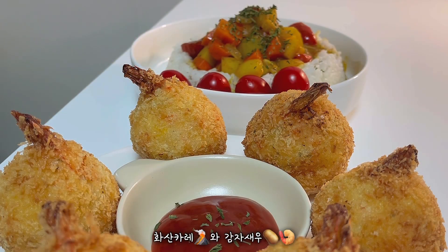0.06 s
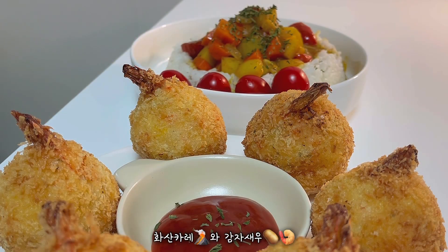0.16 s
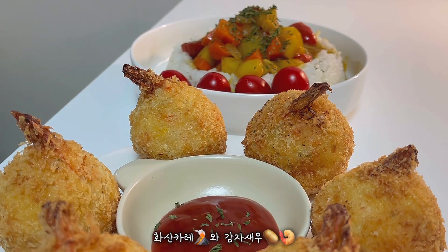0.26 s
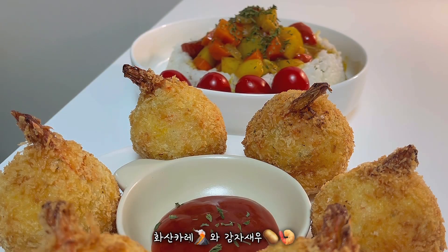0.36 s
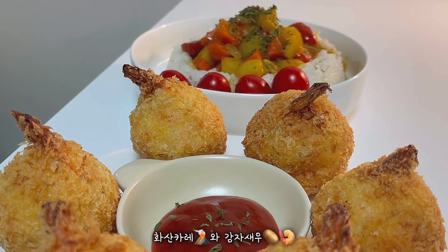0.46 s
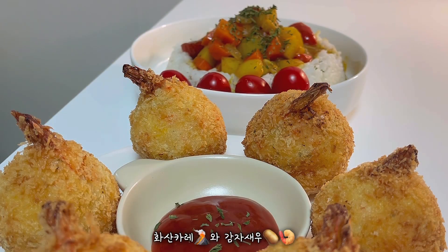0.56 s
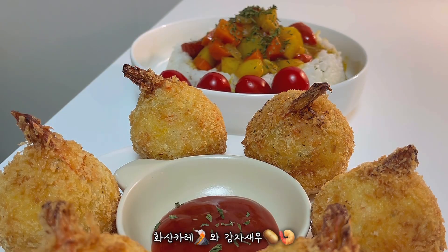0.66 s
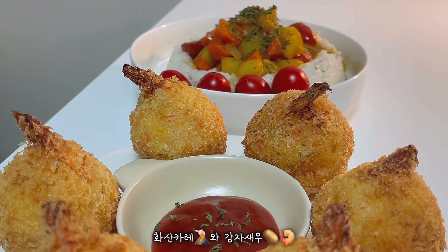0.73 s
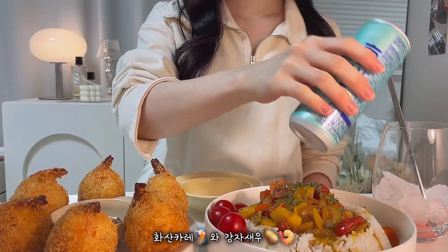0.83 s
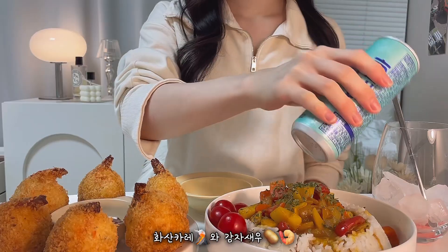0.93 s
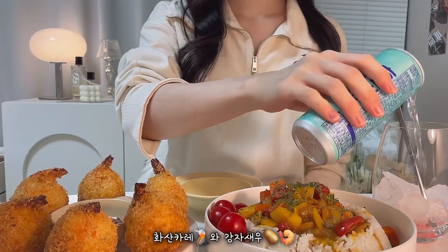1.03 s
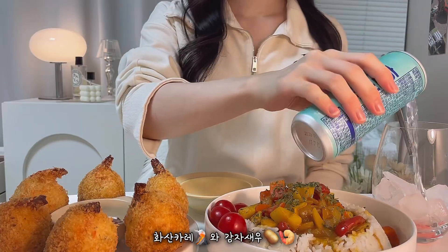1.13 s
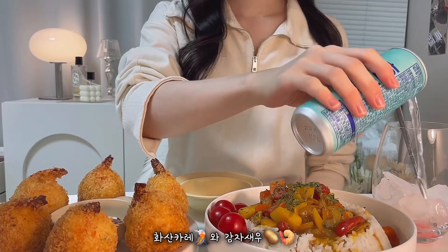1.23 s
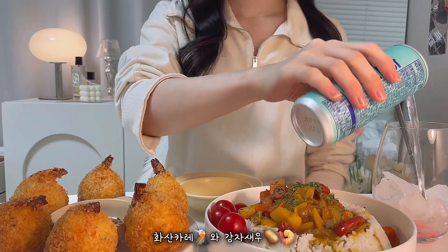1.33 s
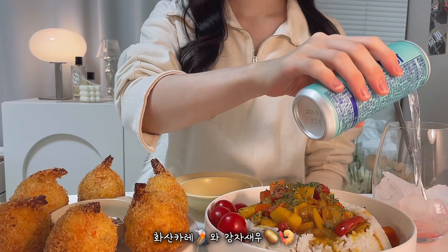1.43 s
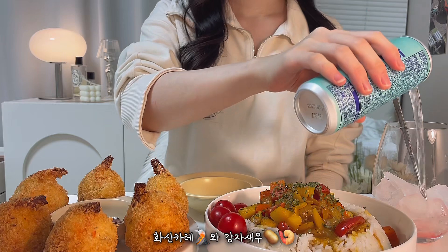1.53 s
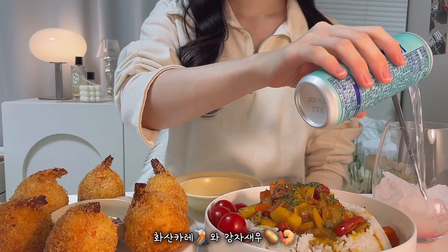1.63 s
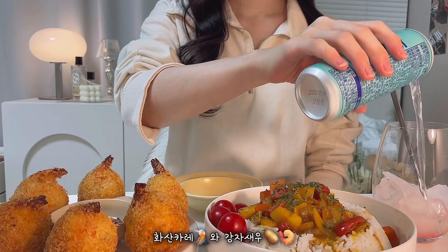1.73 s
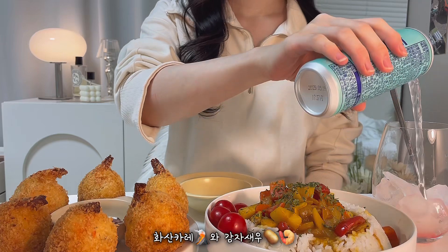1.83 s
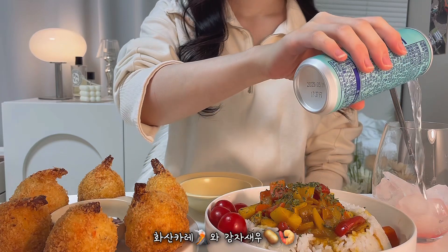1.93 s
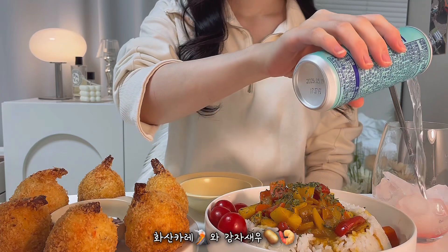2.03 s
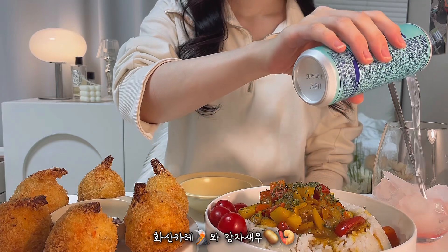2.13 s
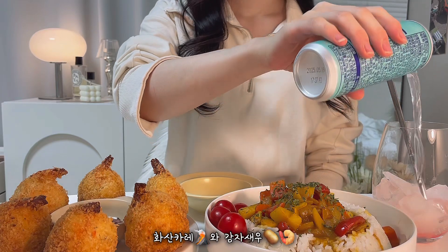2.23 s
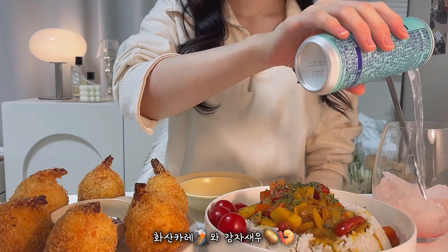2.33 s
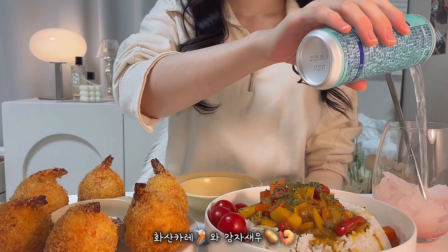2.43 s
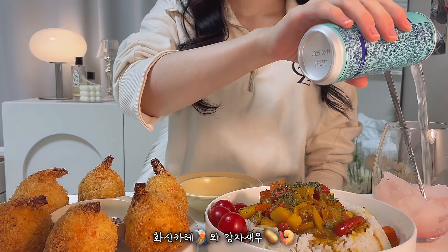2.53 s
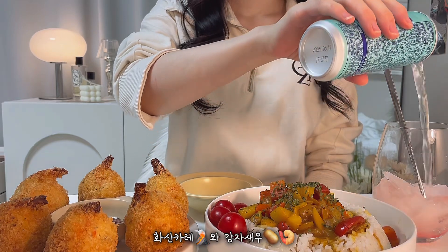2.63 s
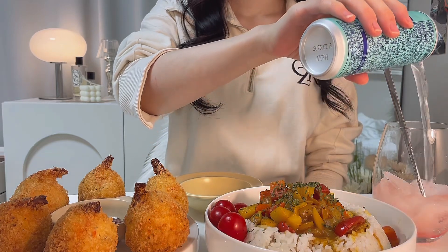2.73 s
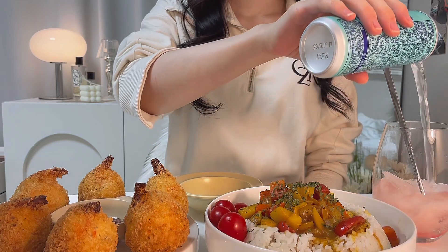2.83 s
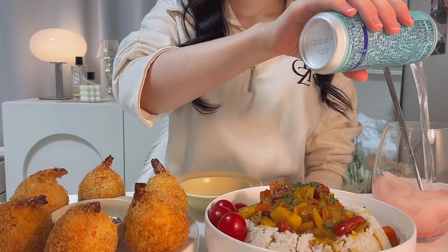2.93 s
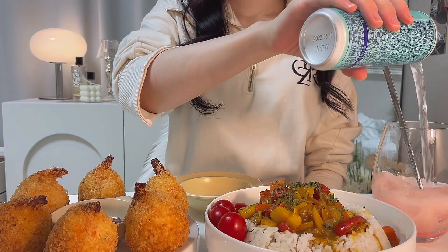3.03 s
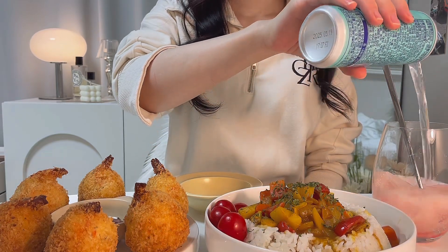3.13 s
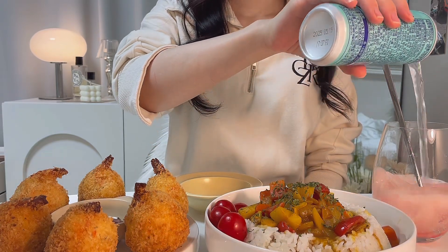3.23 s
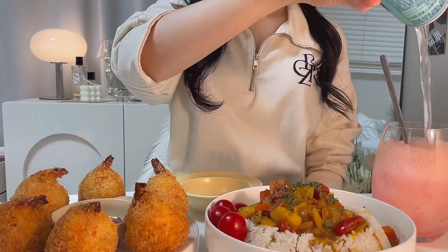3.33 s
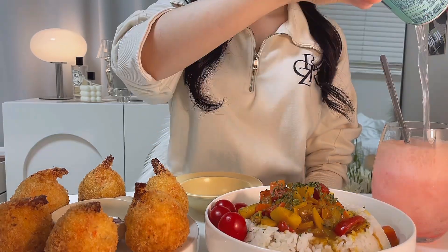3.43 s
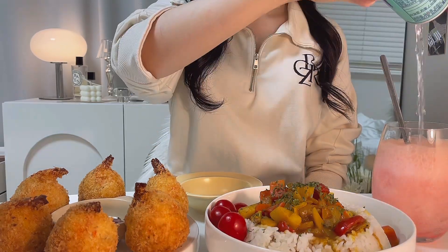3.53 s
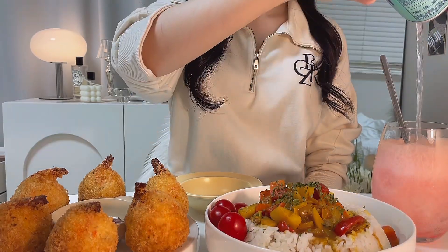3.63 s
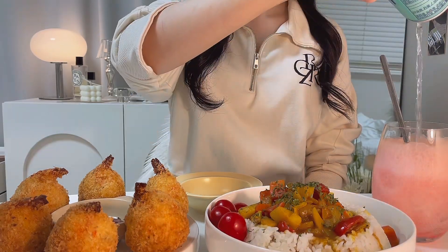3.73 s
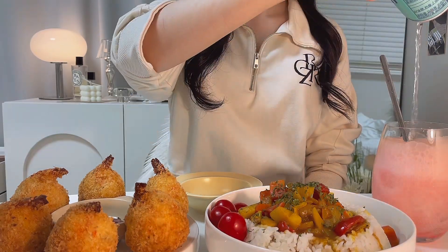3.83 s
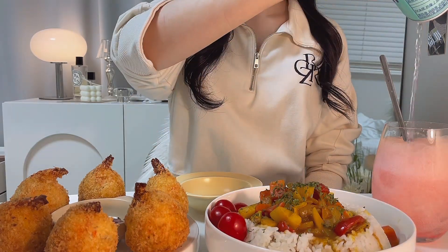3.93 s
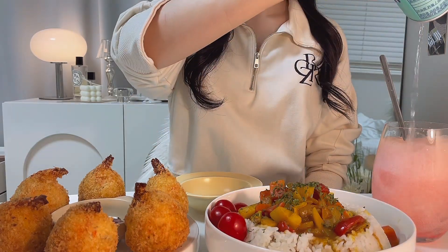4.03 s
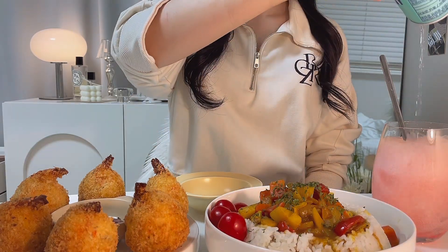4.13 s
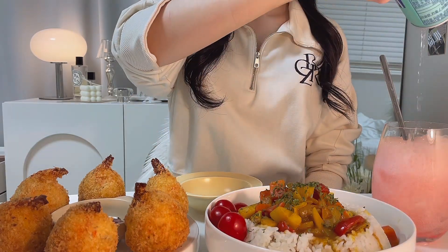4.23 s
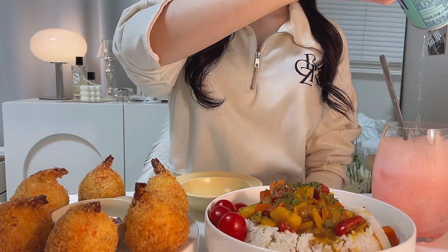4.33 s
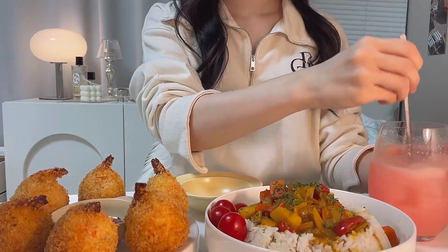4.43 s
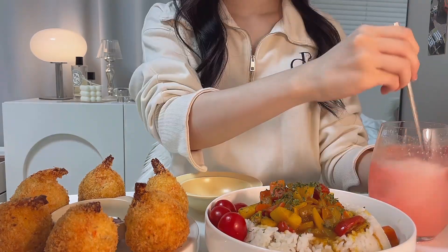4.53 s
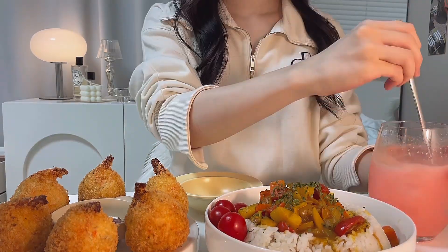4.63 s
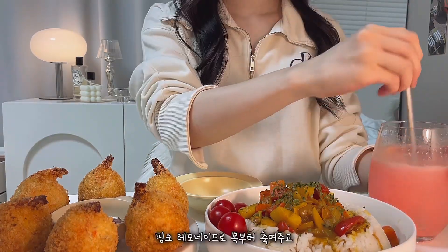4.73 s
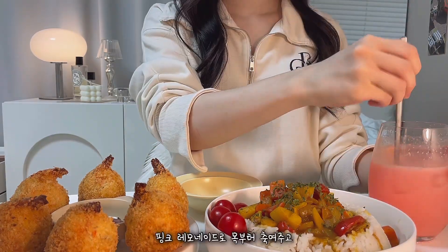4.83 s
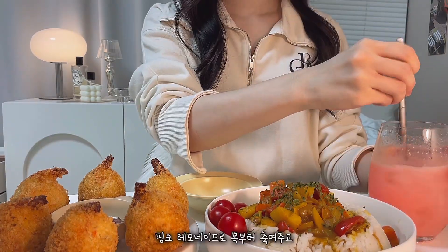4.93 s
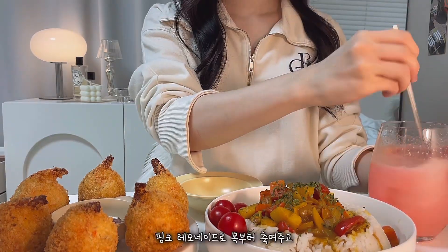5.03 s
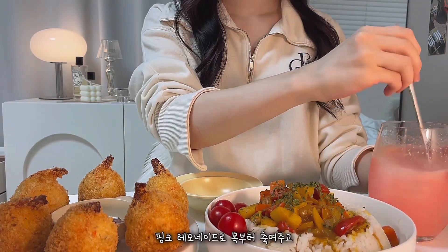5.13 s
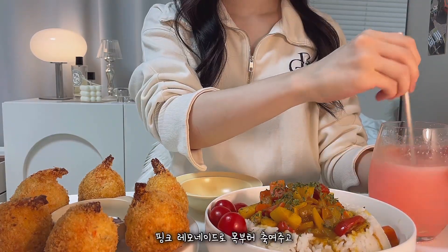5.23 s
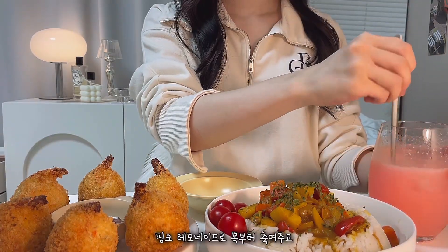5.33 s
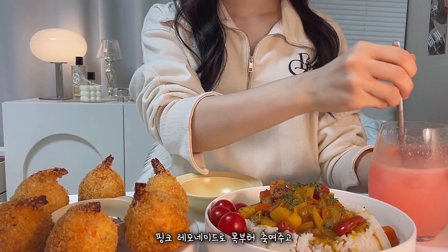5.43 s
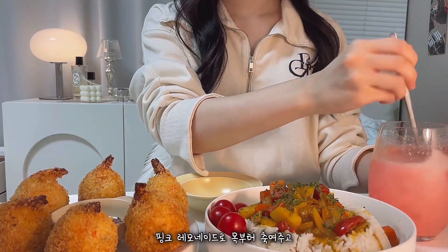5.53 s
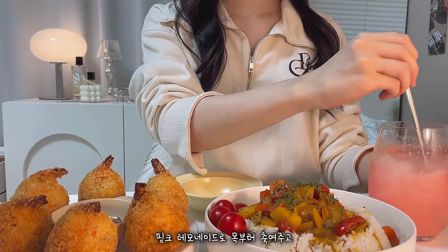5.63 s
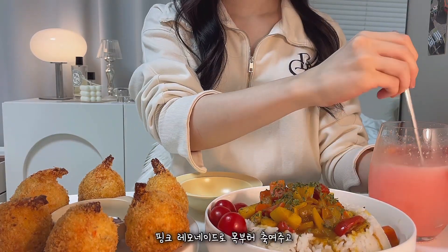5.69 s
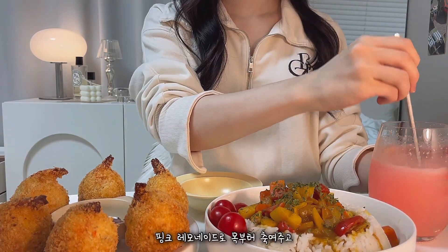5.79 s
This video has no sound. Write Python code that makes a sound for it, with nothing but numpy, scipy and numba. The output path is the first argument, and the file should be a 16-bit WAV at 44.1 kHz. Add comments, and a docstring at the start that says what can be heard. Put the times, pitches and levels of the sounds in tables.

```python
"""A fridge hums in a quiet room, two close tones beating; then a fizzy drink is poured from a can over ice into
a round glass and stirred with a metal straw, close to a phone. Bubbles, as short rings, make crackle at steady
pitch, and froth, splash and glugs at rising pitch; noise adds fizz. Ice knocks are bursts of noise driving
damped modes, with a dull thud; decaying pips are large bubbles bursting and clear rings of the straw tapping
the glass wall, and stirring grinds the cubes together."""
import sys
import numpy as np
from scipy import signal
from scipy.fft import rfft, irfft
from scipy.io import wavfile
from scipy.ndimage import uniform_filter1d
from numba import njit

SR = 44100
rng = np.random.default_rng(int(sys.argv[2]) if len(sys.argv) > 2 else 0)


def to_wav(sig):
    """Store sig (one row per channel, or 1-D mono) as 16-bit WAV at the path in sys.argv[1].

    Samples outside -1..1 are clipped; the rate is SR.
    """
    pcm = np.clip(np.atleast_2d(sig), -1, 1) * 32767
    pcm = np.round(pcm).astype(np.int16)
    wavfile.write(sys.argv[1], SR, pcm.T)  # frames by channels


N = 258426

# Overtones of the motor, smeared by its casing: (frequency [Hz], width [Hz], level [dB])
CASING_OVERTONES = [(120, 11, -65), (133.8, 16, -60), (172.5, 22, -67.5), (240.2, 20, -54.5),
                    (278.3, 22, -63.5), (367.7, 30, -64.5), (486, 24, -72.5)]
# Spectrum of the room air: (frequency [Hz], density [dB per Hz])
ROOM_SPECTRUM = [(15, -57), (25, -36), (39, -4), (64, -1.5), (88, -11.5), (112, -12), (196, -14.5),
                 (243, -12.5), (309, -18), (363, -22), (394, -23), (488, -32), (15000, -46)]
# Tilt that turns room air into faint hiss: (frequency [Hz], gain [dB])
HISS_TILT = [(1150, -26), (1550, 9), (6500, 7.5), (7100, -15), (7900, -15), (8700, 4), (12500, 2.5),
             (13500, -19)]
# Steps of the hum: (start [s], mains tone [dB], motor tone [dB], delay until both are in step [s],
# mains phase [turns], rumble [dB])
HUM_STEPS_TABLE = [(0, -48.5, -53.5, 0.14, 0.34, -54.5), (.78, -46, -52, 0.2, 0.34, -52),
                   (3.331, -45, -55.5, 0.12, 0.067, -52.5), (4.379, -46.5, -51, 0.31, 0.47, -50)]
# Fizz of the drink: (time [s], coarse hiss level [dB], finest bubbles level [dB])
FIZZ_LEVELS = [(1.04, -90, -81), (1.12, -68, -68), (1.18, -59, -59.5), (1.3, -58.5, -59),
               (3.29, -62, -63.5), (3.36, -64, -67), (5.86, -66, -69)]
# Spectrum of the fizz: (frequency [Hz], density [dB per Hz])
FIZZ_SPECTRUM = [(1300, -39), (1630, 5.5), (1900, -11.5), (2240, 2), (2660, -8), (3000, 0.5), (4000, 0.5),
                 (5000, 4.5), (6500, 2), (7100, -23.5), (7900, -14), (8700, -7.5), (11200, -8.5),
                 (12900, -16), (13600, -41), (16000, -30)]
# Resonances of the glass at which the froth bubbles are pitched: (frequency [Hz], nearly empty [dB], full [dB])
GLASS_RESONANCES = [(1630, -7.5, -35), (2240, -3.5, -31), (2930, -2.5, -6.5), (3700, -6.5, -11),
                    (4050, -2.5, -21), (4850, -19.5, -1), (5130, -14, 0)]
# Filling of the glass: (time [s], fullness [0-1], froth gain [dB])
FILLING = [(1.1, 0.05, -79), (1.17, 0, -67), (2.05, 0.5, -65.5), (2.25, 0.48, -66), (3.3, 0.57, -64),
           (3.35, 0.9, -82)]
# The poured stream: (time [s], glug level [dB], splash level [dB])
STREAM_LEVELS = [(1.1, -83, -84), (1.21, -62, -72), (1.25, -72, -69), (1.32, -54.5, -78),
                 (1.36, -68, -61.5), (1.43, -54, -70), (1.49, -70, -70), (1.533, -53, -80), (1.6, -72, -71),
                 (1.86, -65, -73), (1.98, -76.5, -74), (2.07, -59, -68), (2.18, -57, -77), (2.25, -68, -63),
                 (2.37, -54.5, -82), (2.44, -63.5, -66), (2.53, -57, -63.5), (2.66, -66.5, -70),
                 (2.76, -63, -73), (2.88, -58.5, -67), (3.03, -68, -73), (3.1, -51.5, -73),
                 (3.21, -78, -66), (3.27, -58, -62), (3.33, -91, -66), (3.5, -99, -59), (4.36, -99, -66.5)]
# Large bubbles bursting, and clear rings of the straw tapping the glass wall: # (time [s], level [dB], initial
# pitch [Hz], t60 [s])
PIP_EVENTS = [(1.128, -47, 4250, .015), (1.173, -46.5, 3040, 0.016), (1.174, -47.5, 3920, 0.02),
              (1.256, -46, 4850, 0.016), (1.425, -48, 3060, .015), (1.467, -47, 3020, 0.016),
              (1.5094, -51, 3000, .012), (1.53, -54, 2980, .015), (1.6173, -51, 2870, 0.035),
              (1.6885, -50.5, 5840, .012), (2.1813, -46.5, 5600, .012), (2.212, -48, 6300, .012),
              (2.234, -46.5, 4850, .012), (2.298, -48, 4820, .012), (2.307, -46, 2850, .014),
              (2.4881, -51.5, 4760, .015), (2.548, -48, 3180, 0.014), (2.611, -50.5, 2500, 0.022),
              (2.8353, -47.5, 5050, 0.01), (3.016, -51, 3050, .015), (3.723, -53, 1620, 0.03),
              (4.548, -39, 1680, .025), (4.69, -41.5, 1630, 0.064), (4.765, -49, 2500, 0.036),
              (5.18, -44, 1640, 0.026), (5.199, -34.5, 1640, 0.048), (5.2563, -29.5, 2450, 0.048),
              (5.527, -28.5, 1620, 0.019), (5.8052, -27.5, 2460, 0.021), (5.821, -25, 1624, 0.036),
              (5.8524, -26.5, 2400, 0.041)]
# Sweeps of the straw through the ice: (strongest time [s], grinding level [dB], half length [s])
STRAW_SWEEPS = [(4.542, -36, 0.079), (4.858, -49, 0.045), (5.002, -40, 0.074), (5.258, -45, 0.051),
                (5.384, -42, 0.065), (5.564, -42.5, 0.069), (5.829, -40, 0.038)]
# Ice knocks: (time [s], thud level [dB], clack minus thud [dB], tick minus thud [dB], thud pitch [Hz])
ICE_KNOCKS = [(1.004, -62, -15, 9, 563), (1.089, -61, 3.5, 5, 547), (1.172, -62, 19, 7, 614),
              (1.699, -51, -11, 4, 640), (2.141, -54.5, -21, 13.5, 676), (2.3185, -39, 0.5, 18, 980),
              (2.494, -52.5, 4, 18.5, 760), (2.7, -31.5, -14.5, -3.5, 645), (2.827, -43.5, -4, -24, 550),
              (2.855, -45.5, -18, 4, 664), (3.11, -46, -29, -7, 710), (3.152, -30, -10.5, 1, 680),
              (3.319, -49, -7, -20, 650), (3.369, -44, -8, -2, 1110), (3.497, -41.5, -25, -27, 690),
              (3.709, -45, -19, -30, 700), (3.716, -43.5, -25, -32, 930), (3.771, -47, -23, -30, 685),
              (3.919, -47, -20, -17, 1000), (4.139, -59.5, 2, 15.5, 937), (4.377, -31, -17, -25, 910),
              (4.382, -22, -14.5, -21, 844), (4.406, -29, -27, -26, 860), (4.428, -23, -8, -13.5, 1010),
              (4.433, -28, -26, -30, 1070), (4.457, -47, -8, -15, 1110), (4.476, -28, -0.5, -16, 1090),
              (4.489, -21.5, -7.5, -21, 705), (4.501, -26, -13, -23, 720), (4.528, -29.5, 2, -8, 1130),
              (4.538, -20.5, -10, -16.5, 680), (4.583, -22.5, 7, 7.5, 1030), (4.644, -34, -8, -11, 870),
              (4.662, -34.5, -7, -20, 800), (4.673, -35.5, -19, -25, 1010), (4.692, -45, 5, -1, 1030),
              (4.779, -38.5, -7.5, -12, 670), (4.829, -14.5, -13, -21, 746), (4.884, -16.5, -39, -47, 715),
              (4.904, -24, -10, -22, 1080), (4.961, -31, -8, -24, 1240), (4.982, -22.5, -9.5, -9, 770),
              (4.993, -19, -19.5, -49, 986), (5.019, -29, -6.5, -40, 1060), (5.042, -21, -13, -42, 730),
              (5.059, -30, -15, -11, 650), (5.104, -23.5, -40, -45, 1030), (5.141, -44, 1.5, -9, 990),
              (5.164, -37, -5, -11, 1000), (5.182, -47.5, 9.5, 3, 970), (5.199, -37.5, 3.5, 0, 564),
              (5.216, -27, -19, -22, 1040), (5.255, -19.5, -8, -34, 786), (5.269, -27, -6, -12.5, 935),
              (5.281, -22, -29, -38, 750), (5.327, -29.5, -4.5, -17, 1070), (5.334, -22.5, -22, -36, 775),
              (5.349, -19.5, -6.5, -32, 780), (5.368, -20, -6.5, -38, 714), (5.375, -20, -23, -34, 1024),
              (5.383, -23.5, -22, -41, 1130), (5.396, -32, -7, -32, 1000), (5.457, -34.5, -3.5, -13, 1050),
              (5.472, -42, -3, -20, 900), (5.49, -34.5, -4, -36, 710), (5.503, -35.5, -6, -29, 1043),
              (5.513, -36, -3.5, -25, 806), (5.528, -20.5, -8.5, -16.5, 750), (5.55, -32.5, -8, -9, 1080),
              (5.558, -27, -1.5, -5, 1090), (5.569, -36, -19, -20, 1310), (5.582, -33, -9, -28, 1180),
              (5.594, -20, -27, -37, 780), (5.608, -28, -20, -35, 1240), (5.621, -41.5, 6, 1, 910),
              (5.642, -18.5, -13.5, -49, 835), (5.651, -26.5, -12, -36, 930), (5.681, -33, -6, -25, 1007),
              (5.706, -48.5, 8, 1, 1000), (5.717, -41.5, 8, 3, 1010), (5.731, -36, 0, -25, 760),
              (5.756, -34, -24, -30, 765), (5.774, -36, -17, -35, 840), (5.793, -24.5, -7, -13, 800),
              (5.806, -19, -6, -20, 830), (5.821, -22, -2, -36, 760), (5.851, -26.5, -7, -9.5, 710)]
# Nominal modes of the glass and ice: (frequency [Hz], level [dB], t60 [s])
GLASS_ICE_MODES = [(620, -10, .025), (710, -4, .028), (840, -5, .028), (1035, 1, .055), (1150, -4, .035),
                   (1300, -4, .03), (1650, -6, .035), (2400, -12, .028)]
# Nominal thin rings of the glass wall under the crack: (frequency [Hz], level [dB], t60 [s])
WALL_MODES = [(1900, 31.5, 0.025), (3620, 6.5, 0.038), (4300, -24, 0.03), (5050, 13, 0.019),
              (5480, -12, 0.058)]
# Nominal highest rings, under the tick: (frequency [Hz], level [dB], t60 [s])
HIGH_MODES = [(11390, -2.8, 0.015), (10370, 0.9, 0.083)]
# Crack of ice on glass: (frequency [Hz], density [dB per Hz])
CRACK_SPECTRUM = [(1500, 20.5), (2000, 7), (2500, 9), (3300, 4), (4300, 4), (5500, -5), (6500, -4),
                  (7500, -13.5), (8600, -4.5), (10100, -6.5), (11300, -0.5), (13000, -18), (14200, -28),
                  (15400, -40)]
# The two microphone ports: (frequency [Hz], side gain over mid [dB], side phase against mid [rad])
PORT_RESPONSE = [(60, -10, -1.1), (110, -8.5, -1.9), (199, -12.5, -1.8), (376, -3, -1.14), (706, 0, -1.81),
                 (1290, -1, -1.47), (2380, -6.5, -1.4), (4500, -4, -0.6), (5900, -1, -1.08),
                 (7660, 19.5, -1.7), (9060, 0, -1.5), (12400, -24, -1.5), (13280, 17.5, -1.6),
                 (16000, 9, -1.2)]

MAINS_HZ, MOTOR_HZ = 60, 58.7
CASING_STEADY = 0.95  # steady part of each overtone against its wavering parts
# the faint hiss throbs (depth before smoothing), then drops to a lower, steady level
HISS_DB, THROB_DB, THROB_S, THROB_ENDS_S, HISS_AFTER_DB = -76.5, 4.5, 0.227, 0.774, -83.5
# the air in the glass rings higher as the drink rises
AIR_HZ, AIR_RISE_HZ_PER_S, AIR_FULL_HZ, POUR_S = 637.5, 53, 800, 1.13
PIP_SPRAY_DB, PIP_SPRAY_S = -6.5, 0.0041  # spray relative to its pip, and its decay time
# cubes drift on between sweeps; stirring frees more gas (fizz gain over the grinding level)
STIR_S, DRIFT_DB, STIRRED_FIZZ_DB = 4.37, -59, -27.5
MODE_SCATTER_DB = 3
THUD_CYCLES, THUD_SKEW = 3.26, 0.79  # length of the thud; a skew under 1 swells quickly and dies slowly
# a stronger crack against the thud has less low end, a stronger tick more of its very top [dB per dB]
CRACK_TILT, DULL_CLACK_DB, TILT_MOST_DB = 2, 0, 10
TICK_TILT, EVEN_TICK_DB = 0.55, 14
ROOM_T60_S, ROOM_DB = 0.2, -9.5
TOP_HZ = 16400


def undb(db):
    """Logarithmic level: decibels to amplitude gain."""
    return 10 ** (np.asarray(db) / 20)


def unit(x):
    """Power normalization: scale to rms 1."""
    return x / np.sqrt(np.mean(x ** 2))


def peak(x):
    """Amplitude normalization: scale to peak 1."""
    return x / np.max(np.abs(x))


def curve(table, column, outside=None):
    """Linear interpolation of one table column along time."""
    rows = np.array(table)
    return np.interp(np.arange(N) / SR, rows[:, 0], rows[:, column], left=outside, right=outside)


def colour(x, table):
    """Linear filtering in the frequency domain by (Hz, dB) points; a third column turns the phase."""
    hz, db, *turn = np.transpose(table)
    log_hz = np.log(np.fft.rfftfreq(len(x), 1 / SR) + 1)
    gain = undb(np.interp(log_hz, np.log(hz), db))
    phase = np.interp(log_hz, np.log(hz), turn[0]) if turn else 0
    return irfft(rfft(x) * gain * np.exp(1j * phase), len(x))


def band(x, lo_hz, hi_hz):
    """Band-pass filtering with a third-order Butterworth design."""
    return signal.sosfilt(signal.butter(3, [lo_hz, hi_hz], "band", fs=SR, output="sos"), x)


def walk(rate):
    """Slow random modulation: levels held 1 / rate s, smoothed twice, rms 1."""
    hold = int(SR / rate)
    levels = np.repeat(rng.standard_normal(N // hold + 1), hold)
    smooth = uniform_filter1d(uniform_filter1d(levels, hold), hold)
    return unit(smooth[:N])


@njit
def grains(start, hz, cycles, size, glide, n):
    """Bubble resonance: each rings for a few cycles, its pitch rising by the given glide, if any."""
    out = np.zeros(n)
    for k in range(len(start)):
        w, z, i = 2 * np.pi * hz[k] / SR, size[k] + 0j, start[k]
        fade = np.exp(-hz[k] / (cycles * SR))
        for j in range(int(5 * cycles * SR / hz[k])):
            if i + j < n:
                out[i + j] += z.imag
            z *= fade * np.exp(1j * w)
            w *= 1 + glide * hz[k] / (cycles * SR)
    return out


def bubbles(count, hz, spread, cycles, scatter_db, glide):
    """Random superposition of bubbles, pitches around hz, a few much louder than the rest; rms 1."""
    when, detune, loud = rng.random((count, 3)).T
    start = (when * N).astype(np.int64)
    pitch = (hz + np.zeros(N))[start] * np.exp(spread * (2 * detune - 1))
    pitch = np.clip(pitch, 100, SR / 3)
    size = undb(np.minimum(-scatter_db * np.log(1 - loud), 13))
    return unit(grains(start, pitch, 1. * cycles, size, 1. * glide, N))


def ring(blow, modes, draw):
    """Modal excitation: a blow drives modes whose levels and pitches vary at random; peak 1."""
    t = np.arange(len(blow)) / SR
    body = 0
    for (hz, db, t60), (level_draw, pitch_draw) in zip(modes, draw):
        gain = undb(db + MODE_SCATTER_DB * level_draw)
        tone = np.sin(2 * np.pi * hz * (1 + 0.039 * pitch_draw) * t)
        body = body + gain * tone * np.exp(-np.log(1000) * t / t60)
    return peak(signal.fftconvolve(blow, body)[:len(t)])


def step(column):
    """Stepwise modulation: one column of the hum's steps, each change smoothed over 1600 samples."""
    rows = np.array(HUM_STEPS_TABLE)
    now = np.searchsorted(rows[1:, 0], np.arange(N) / SR)
    return uniform_filter1d(rows[now, column], size=1600)


def room_air():
    """Filtered broadband noise: low rumble and a faint hiss that throbs at first."""
    t = np.arange(N) / SR
    air = colour(rng.standard_normal(N), ROOM_SPECTRUM)
    rumble = unit(band(air, 90.4, 1250)) * undb(step(5)) + undb(-68) * unit(band(air, 27, 52))
    throbbing_db = HISS_DB + THROB_DB * np.cos(2 * np.pi * t / THROB_S)
    hiss_db = np.where(t < THROB_ENDS_S, throbbing_db, HISS_AFTER_DB)
    hiss = unit(colour(colour(rng.standard_normal(N), ROOM_SPECTRUM), HISS_TILT))
    return rumble + hiss * undb(uniform_filter1d(hiss_db, size=3000))


def fridge():
    """Beating: mains tone and slipping motor drift through phase, under narrow, unsteady overtones."""
    t = np.arange(N) / SR
    mains = 2 * np.pi * (MAINS_HZ * t + step(4))
    beat = 2 * np.pi * (MAINS_HZ - MOTOR_HZ) * (t - step(0) - step(3))
    tone = np.sqrt(2) * (undb(step(1)) * np.sin(mains) + undb(step(2)) * np.sin(mains - beat))
    rumble_db = step(5)
    swell = undb(rumble_db - np.mean(rumble_db))  # the casing swells with the rumble
    overtones = np.zeros(N)
    for hz, width, db in CASING_OVERTONES:
        in_phase = (CASING_STEADY + walk(width)) * np.cos(2 * np.pi * hz * t)
        quadrature = walk(width) * np.sin(2 * np.pi * hz * t)
        overtones += undb(db) * (in_phase + quadrature)
    return tone + swell * overtones


def stirring():
    """Amplitude envelope of the grinding cubes: a Gaussian swell for each sweep over a steady drift."""
    t = np.arange(N) / SR
    sweeps = sum(undb(db) * np.exp(-((t - s) / half) ** 2) for s, db, half in STRAW_SWEEPS)
    return (sweeps + undb(DRIFT_DB)) * np.clip((t - STIR_S) / 0.017, 0, 1)


def fizz():
    """Superposed bubble bursts: a smooth hiss of noise with single crackles and sparkle in it."""
    crackle = bubbles(count=30000, hz=6150, spread=1.3, cycles=1.3, scatter_db=6.5, glide=0)
    sparkle = bubbles(count=4000, hz=10600, spread=0.191, cycles=40, scatter_db=15.0, glide=.003)
    hiss = colour(rng.standard_normal(N) + undb(-12.0) * crackle, FIZZ_SPECTRUM)
    coarse = unit(band(hiss, 2060, 6780)) * undb(walk(30.56))
    fine = unit(band(hiss, 5340, 13400)) * undb(walk(29.91)) + undb(-6.0) * sparkle
    stirred = undb(STIRRED_FIZZ_DB) * stirring()
    coarse_gain = undb(curve(FIZZ_LEVELS, 1, -120)) + stirred
    fine_gain = undb(curve(FIZZ_LEVELS, 2, -120)) + undb(-3.0) * stirred
    return coarse * coarse_gain + fine * fine_gain


def froth():
    """Resonance: dense small bubbles pitched at modes of the glass, rebalanced as it fills."""
    full = np.clip(curve(FILLING, 1), 0, 1)
    swarm = np.zeros(N)
    for hz, empty_db, full_db in GLASS_RESONANCES:
        level_db = empty_db + (full_db - empty_db) * full + 1.9 * walk(14)
        grain = bubbles(count=1500, hz=hz, spread=.045, cycles=9, scatter_db=3.8, glide=.003)
        swarm += undb(level_db) * grain
    return undb(curve(FILLING, 2, -120)) * swarm


def pour():
    """Air-column resonance: glugs climb in pitch as the glass fills; splash spreads around them."""
    t = np.arange(N) / SR
    air_hz = np.minimum(AIR_HZ + AIR_RISE_HZ_PER_S * (t - POUR_S), AIR_FULL_HZ)
    glugs = bubbles(count=2200, hz=air_hz, spread=0.056, cycles=4.4, scatter_db=2.5, glide=0.033)
    splash = bubbles(count=6000, hz=852, spread=0.49, cycles=1.0, scatter_db=1.0, glide=0.016)
    glug_gain = undb(curve(STREAM_LEVELS, 1, -120) + 0.87 * walk(24.7))
    return glug_gain * glugs + undb(curve(STREAM_LEVELS, 2, -120)) * splash


def pips():
    """Damped oscillation: each pip swells and dies, its pitch creeping up, under a short spit of spray."""
    out, t = np.zeros(N + 2048), np.arange(2048) / SR
    for s, db, hz, t60 in PIP_EVENTS:
        shape = peak((1 - np.exp(-t / 0.00037)) * np.exp(-np.log(1000) * t / t60))
        tone = shape * np.sin(2 * np.pi * hz * t * (1 + 0.41 * t))
        spit = rng.standard_normal(len(t)) * np.exp(-t / PIP_SPRAY_S)
        spray = peak(band(spit, hz / 1.42, hz * 1.9))
        start = int(s * SR)
        out[start:start + 2048] += undb(db) * (tone + undb(PIP_SPRAY_DB) * spray)
    return out[:N]


def grinding():
    """Random impulsive excitation: small bumps between cubes ring the same glass and crunch faintly."""
    bumps = (rng.random(N) < 700 / SR) * undb(np.minimum(3.5 * rng.exponential(size=N), 9))  # 700 per s
    contact = signal.lfilter([1], [1, -np.exp(-1 / (0.0024 * SR))], bumps)  # decay constant 2.4 ms
    scrape = contact * rng.standard_normal(N)
    # the scrape switches at random among four random variants of the modes
    variant = rng.integers(4, size=N // 1024 + 1).repeat(1024)[:N]
    low = np.zeros(N)
    for k, draw in enumerate(rng.standard_normal((4, 8, 2)) / 2):
        low += unit(ring(scrape * (variant == k), GLASS_ICE_MODES, draw))
    high = colour(band(scrape, 1400, 6000), CRACK_SPECTRUM)
    return stirring() * (unit(low) + undb(-17.0) * unit(high))


def knock(thud_db, clack_db, tick_db, thud_hz):
    """Impact: a crunchy crack with faint rings, then a few cycles of dull thud from the drink-filled glass."""
    t = np.arange(4096) / SR
    draw = rng.standard_normal((3, 8, 2))
    scrape, crack_noise = rng.standard_normal((2, len(t)))

    late = np.maximum(t - .001, 0)  # the heavy drink answers a moment after the contact
    swell = np.sin(np.pi * np.minimum(late * thud_hz / THUD_CYCLES, 1) ** THUD_SKEW)
    push = np.sin(2 * np.pi * thud_hz * late) * swell
    rub = scrape * np.exp(-t / .004) * (1 - np.exp(-t / .002))
    thud = band(.8 * push + .45 * ring(rub, GLASS_ICE_MODES, draw[0]), 530, 4600)

    crunch = colour(crack_noise, CRACK_SPECTRUM)
    # the cube chatters against the wall, so the crack dies unevenly
    ragged = undb(4 * np.repeat(rng.standard_normal(64), 64))
    fade = (1 - np.exp(-t / .001)) * (np.exp(-t / .0022) + .26 * ragged * np.exp(-t / .012))
    wall_ring = ring(scrape * np.exp(-t / .003), WALL_MODES, draw[1])
    clack = peak(band(crunch, 1500, 7400) * fade) + .3 * wall_ring
    thin_db = -np.clip(CRACK_TILT * (clack_db - DULL_CLACK_DB), 0, TILT_MOST_DB)
    clack = peak(band(colour(clack, [(2300, thin_db), (2800, 0)]), 1300, 8000))

    snap = (1 - np.exp(-t / .0004)) * (np.exp(-t / .0012) + .13 * ragged * np.exp(-t / .006))
    high_ring = ring(scrape * np.exp(-t / 0.0042), HIGH_MODES, draw[2])
    tick = peak(band(crunch, 9100, 17000) * snap) + 0.12 * high_ring
    top_db = max(TICK_TILT * (tick_db - EVEN_TICK_DB), -TILT_MOST_DB)
    tick = colour(tick, [(11000, 0), (12500, top_db)])
    return undb(thud_db) * (thud + undb(clack_db) * clack + undb(tick_db) * tick)


def ice():
    """Superposition of the separate impacts of ice on the glass."""
    out = np.zeros(N + 4096)
    for s, *blow in ICE_KNOCKS:
        start = int(s * SR)
        out[start:start + 4096] += knock(*blow)
    return out[:N]


def room_tail(knocks):
    """Reverberation: the knocks convolved with decaying noise, separate for each channel."""
    t = np.arange(SR // 2) / SR
    tail = rng.standard_normal((2, len(t))) * np.exp(-np.log(1000) * t / ROOM_T60_S) * (t > .003)
    tail = signal.lfilter([1], [1, -.6], tail)  # the walls swallow treble
    tail = undb(ROOM_DB) * tail / np.sqrt(np.sum(tail ** 2, axis=1, keepdims=True))
    return signal.fftconvolve(knocks[None], tail, axes=1)[:, :N]


def ports(mid, other, alike):
    """Partial coherence: two ports hear a source out of phase with each other, and partly unrelated."""
    alike = np.clip(alike, 0, 1)
    side = colour(alike * mid + np.sqrt(1 - alike ** 2) * other, PORT_RESPONSE)
    return np.array([mid + side, mid - side])


def scene():
    """Superposition of steady sounds, knocks with a short room tail, pips and the fridge."""
    mid, other = (fizz() + froth() + pour() + grinding() + room_air() for _ in range(2))
    steady = ports(mid, other, alike=0.83)
    knocks = ice()
    direct = knocks + pips()
    hits = direct + np.outer([1, -1], colour(direct, PORT_RESPONSE)) * 0.84
    hum = np.outer(undb([.55, -.55]), fridge())  # slightly louder on the left
    return steady + hits + room_tail(knocks) + hum


def record(dry):
    """Low-pass filtering: the phone cuts the top."""
    return signal.sosfilt(signal.ellip(10, .2, 80, TOP_HZ, fs=SR, output="sos"), dry)


dry = scene()
out = record(dry)
to_wav(out)
```